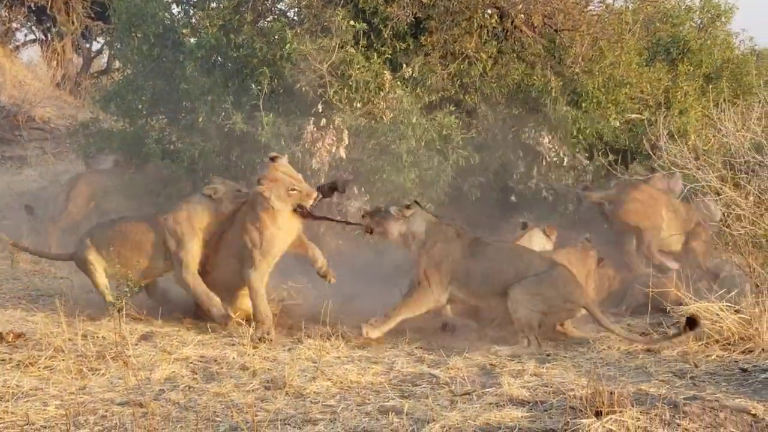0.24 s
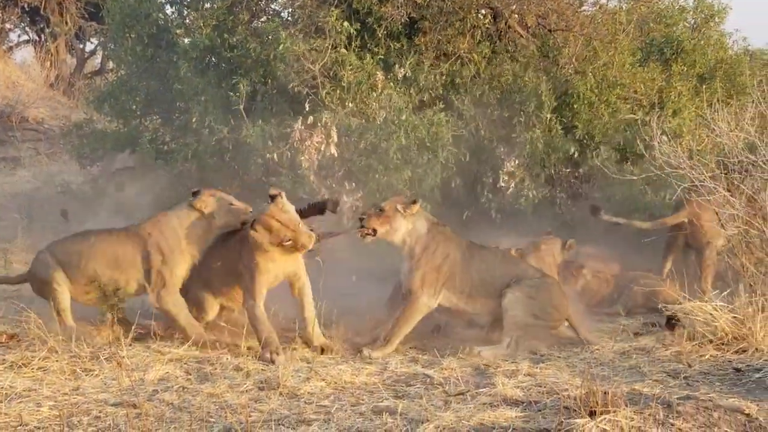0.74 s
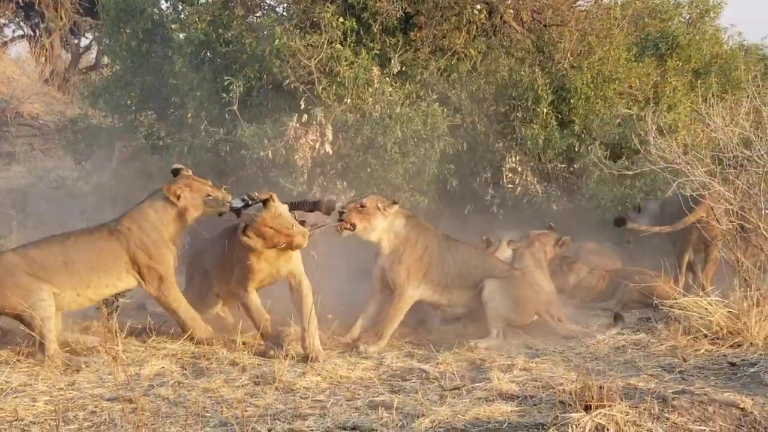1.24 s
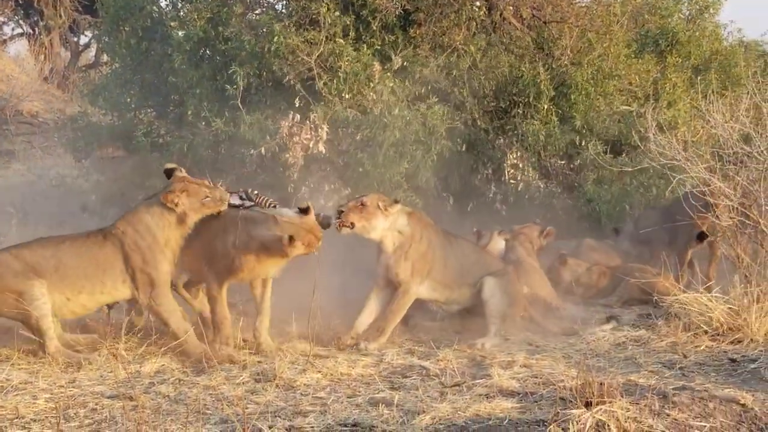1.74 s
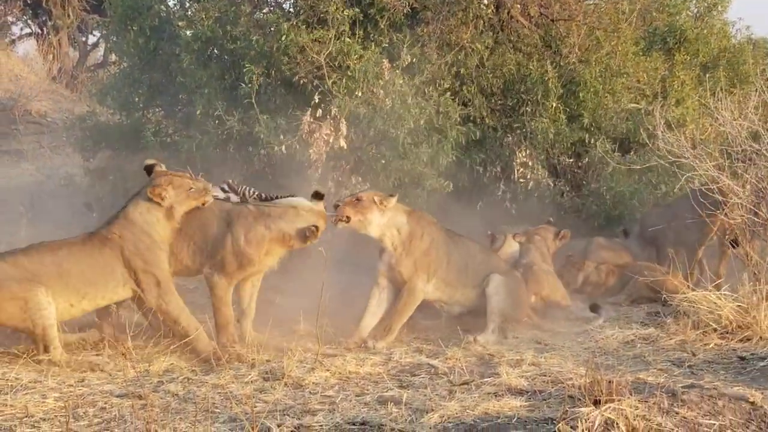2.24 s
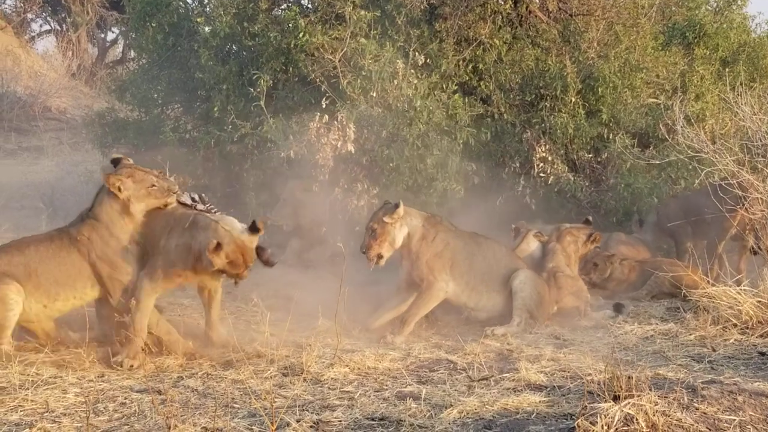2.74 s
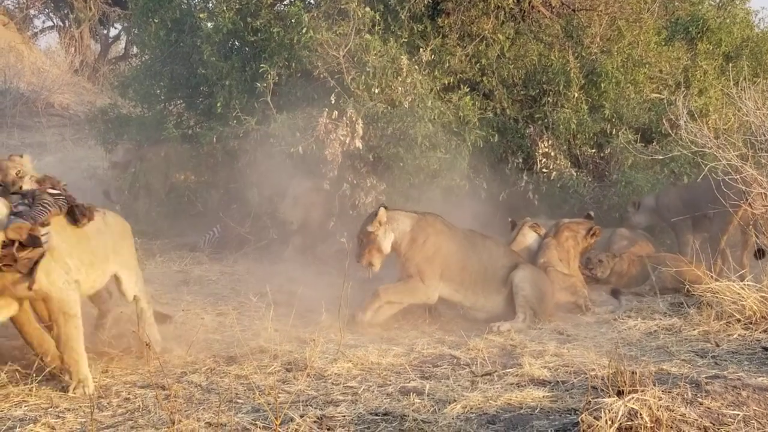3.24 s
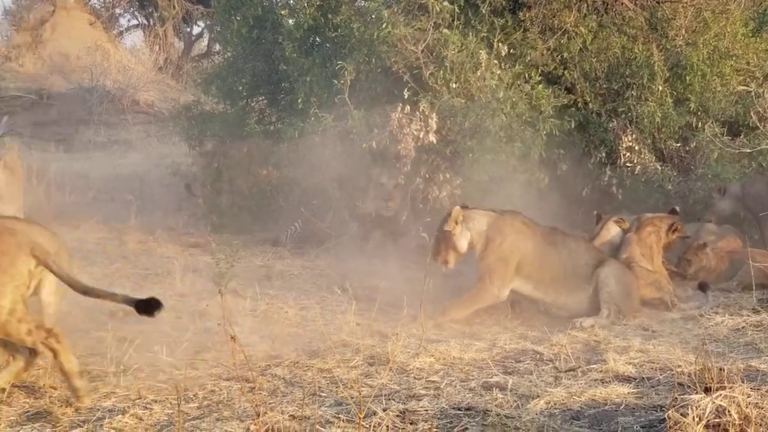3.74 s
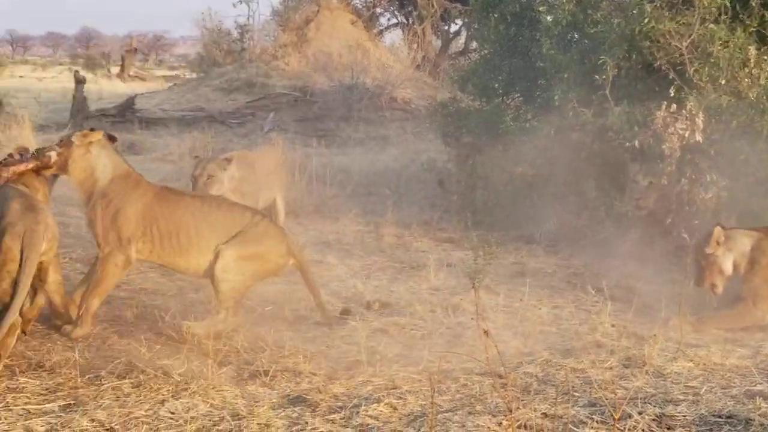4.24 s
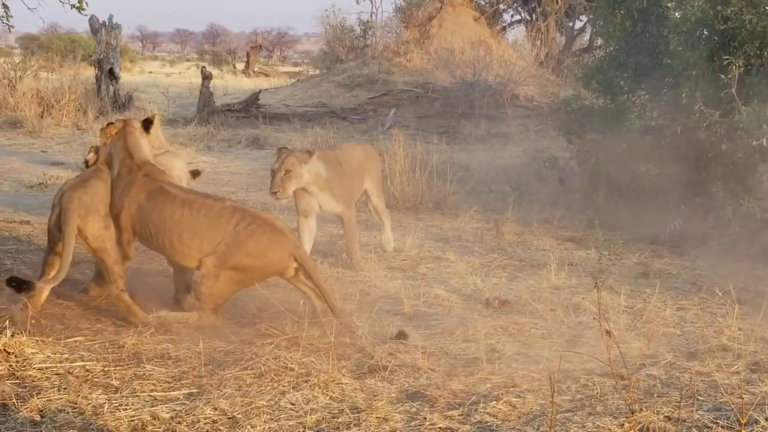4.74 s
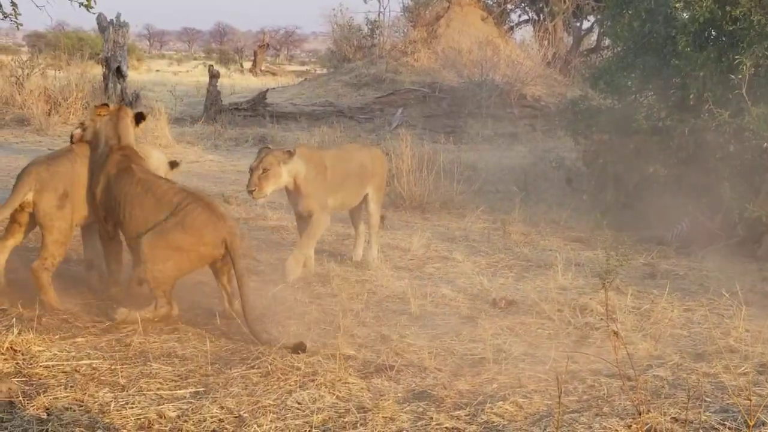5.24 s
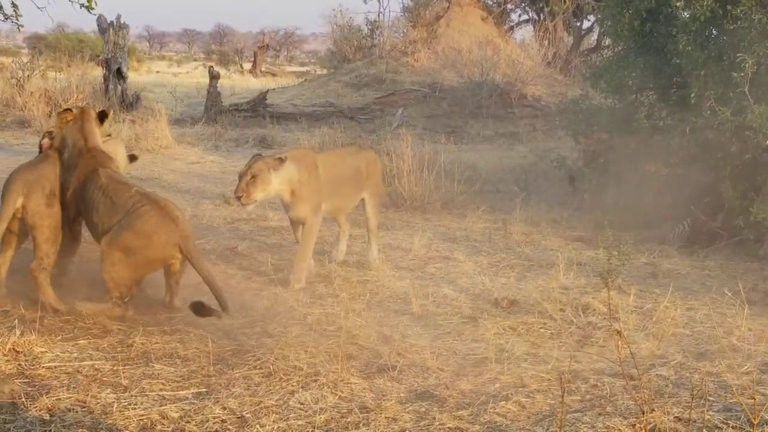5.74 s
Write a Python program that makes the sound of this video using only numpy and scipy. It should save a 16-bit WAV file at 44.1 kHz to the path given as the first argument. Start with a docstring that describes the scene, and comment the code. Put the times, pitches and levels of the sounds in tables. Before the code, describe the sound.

Lionesses tussling over a carcass growl in low, slowly pulsing rumbles that run into each other, with open-mouthed rasping snarls strongest in the first second. Paws sweep through crackling dry grass and stalks tick. A close camera shutter fires once early, then several times after three and a half seconds. Growling thins near five seconds. Outdoors in open bush, stereo microphone beside the camera, almost no echo.

```python
"""Lions growl and snarl over a carcass in dry open bush: slow vocal-fold pulses and breath noise ring
chest, throat and mouth, with rasping air at the teeth and strong single slaps as short sagging tones.
Paws scuff dry grass (flickering hiss with crackle) and stalks snap (short bursts of banded noise).
A close camera shutter rattles now and then, a thin whir (narrow fluttering hiss) follows one shot,
and a faint bed of low-heavy air noise lies beneath."""
import sys
import numpy as np
from scipy import signal
from scipy.fft import rfft, irfft, next_fast_len
from scipy.io import wavfile
from scipy.ndimage import uniform_filter1d

SR = 44100
rng = np.random.default_rng(int(sys.argv[2]) if len(sys.argv) > 2 else 0)


def voltage_ratio(level):
    """Linear amplitude factor for a level in decibels (scalar or array-like)."""
    return 10 ** (np.asarray(level, float) / 20)


def persist_wave(psi):
    """Save psi, clipped to +-1, as 16-bit WAV."""
    counts = np.round(np.clip(psi, -1, 1) * 32767).astype(np.int16)
    wavfile.write(sys.argv[1], SR, np.atleast_2d(counts).T)


N = 264159


def rms_one(x):
    """Scales x to an RMS of 1."""
    return x / np.sqrt(np.mean(x ** 2) + 1e-20)


def evened(x, span_s=0.07):
    """Divides out slow level changes, with a floor so that silence stays quiet."""
    size = int(span_s * SR)
    power = uniform_filter1d(uniform_filter1d(x ** 2, size), size)
    return x / np.sqrt(power + 0.048 * np.mean(x ** 2))


def in_time(rows):
    """Interpolates the columns of a table over time; the first column is in seconds."""
    s, *columns = np.transpose(rows)
    return [np.interp(np.arange(N) / SR, s, c) for c in columns]


def drift(pole_hz):
    """Slow chance of RMS 1: noise through a double pole, computed at every 40th sample."""
    r = np.exp(-2 * np.pi * pole_hz * 40 / SR)
    slow = signal.lfilter([1], [1, -2 * r, r * r], rng.standard_normal(N // 40 + 2002))[2000:]
    return np.interp(np.arange(N) / 40, np.arange(len(slow)), rms_one(slow))


def coloured(x, spectrum):
    """Shapes x by a (Hz, dB) spectrum interpolated on a log-frequency axis."""
    size = next_fast_len(N)
    hz, level_db = np.transpose(spectrum)
    log_hz = np.log(np.arange(size // 2 + 1) * SR / size + 1)
    gain = voltage_ratio(np.interp(log_hz, np.log(hz), level_db))
    return irfft(rfft(x, size) * gain, size)[..., :N]


def poles(hz, width_hz):
    """Filter coefficients of one resonance with about unit gain at its centre."""
    r = np.exp(-np.pi * width_hz / SR)
    return [(1 - r * r) / 2, 0, (r * r - 1) / 2], [1, -2 * r * np.cos(2 * np.pi * hz / SR), r * r]


def resonances(x, modes):
    """Parallel resonances (Hz, width Hz, dB) with alternating signs."""
    return sum((-1) ** k * voltage_ratio(db) * signal.lfilter(*poles(hz, width_hz), x)
               for k, (hz, width_hz, db) in enumerate(modes))


def moving(x, hz, width_hz):
    """A resonance whose centre follows hz, stepped in blocks of 256 samples."""
    out, state = np.zeros(N), np.zeros(2)
    for i in range(0, N, 256):
        out[i:i + 256], state = signal.lfilter(*poles(hz[i], width_hz), x[i:i + 256], zi=state)
    return out


def moving_twice(x, hz, width_hz):
    """Two moving resonances in series, which keep the valleys between cavities dark."""
    return moving(moving(x, hz, width_hz), hz, width_hz)


def band(x, low_hz, high_hz):
    """Band-pass filter."""
    return signal.sosfilt(signal.butter(2, [low_hz, high_hz], "band", fs=SR, output="sos"), x)


def effort(rows, rise_db_per_s, fall_db_per_s):
    """Each row (first s, last s, dB, dB) rises, slides and falls away; powers add. Gives dB."""
    t = np.arange(0, N + 64, 64) / SR
    power = 0
    for first, last, a_db, b_db in rows:
        level_db = np.interp(t, [first, last], [a_db, b_db])
        level_db = level_db - rise_db_per_s * np.maximum(first - t, 0)
        level_db = level_db - fall_db_per_s * np.maximum(t - last, 0)
        power = power + voltage_ratio(2 * level_db)
    return np.interp(np.arange(N) / SR, t, 10 * np.log10(power + 1e-12))


# Stretches of growl, often running straight on. Each row: first in seconds, last in seconds,
# chest level in dB at first, chest level in dB at last, fold slaps per second at first, roughness from 0 to 1.
GROWL_STRETCHES = [(.005, 0.125, -30.5, -38.5, 27.4, 0.45), (0.222, 0.352, -34, -40.5, 41, 0.26),
                   (0.381, 0.496, -29.5, -27, 33, 0.23), (0.52, 0.674, -27, -28, 36, 0.12),
                   (0.689, 0.908, -29.5, -35.5, 37.7, 0.19), (0.918, 1.086, -33.5, -37.5, 32.4, 0.25),
                   (1.112, 1.337, -29, -31, 28.6, 0.29), (1.411, 1.745, -40, -51.5, 32.8, 0.6),
                   (1.814, 2.053, -34.5, -36, 22, 0.2), (2.198, 2.24, -51.5, -42, 25, 0.8),
                   (2.317, 2.454, -30, -43.5, 32.7, 0.27), (2.474, 2.903, -32, -40, 24.5, 0.24),
                   (3.005, 3.166, -36.5, -35.5, 33.4, 0.16), (3.346, 3.437, -36, -26.5, 40.4, 0.31),
                   (3.465, 3.61, -30.5, -33, 37.5, 0.32), (3.606, 3.895, -26, -32.5, 33.2, .17),
                   (3.921, 4.175, -32.5, -35, 32.5, 0.25), (4.206, 4.585, -41, -52.5, 29.8, 0.2),
                   (4.623, 4.695, -57, -47, 27.4, 0.57), (4.745, 4.928, -29.5, -37.5, 41, 0.35),
                   (4.953, 5.188, -38, -42, 32.2, 0.5), (5.389, 5.487, -44, -60.5, 23, 0.62),
                   (5.566, 5.655, -43.5, -45, 37, 0.6), (5.732, 5.79, -51, -34, 30, 0.42),
                   (5.806, 5.999, -34, -38, 26, 0.26)]
SLAPS_PER_S_PER_DB = 0.51   # the folds slow down as the effort sags


def folds(jitter_ms=6.0, uneven_db=4.0, puff_s=0.012):
    """Slack folds slap shut in slow pulses, more uneven when rough; a puff of turbulent air follows each."""
    slaps, rough = np.zeros(N), np.zeros(N)
    for first, last, a_db, b_db, slaps_per_s, roughness in GROWL_STRETCHES:
        roughness = np.clip(roughness, 0, 0.95)
        rough[int(first * SR):] = roughness
        s = first
        # roughness scales both jitter and unevenness
        for shift, size in roughness * rng.standard_normal((20, 2)):
            i = int(np.clip((s + jitter_ms * shift / 1000) * SR, 0, N - 1))
            slaps[i] = voltage_ratio(uneven_db * size)
            change_db = np.interp(s, [first, last], [0, b_db - a_db])
            s += 1 / max(slaps_per_s + SLAPS_PER_S_PER_DB * change_db, 10)
            if s > last:
                break
    puff_shape = signal.lfilter([1], [1, -np.exp(-1 / (puff_s * SR))], slaps + 1e-18)
    puffs = rms_one(puff_shape * rng.standard_normal(N))
    steady = 1.9 * rng.standard_normal(N)
    return np.sqrt(1 - rough) * rms_one(slaps), puffs, rough, steady


# Fixed deep cavities. Each row: centre in Hz, width in Hz.
DEEP_CAVITIES = [(58.2, 14), (96, 28)]
# How the chest shares its rumble. Each row: time in seconds, lowest cavity in dB relative to the chest,
# second cavity in dB relative to the chest, centre of the upper cavity in Hz.
CHEST_SHARES = [(0, -6, -4.5, 156), (.3, -7.5, -6, 144), (.52, -8.5, -2.5, 155), (.68, -6.5, -7, 136),
                (.85, -0.5, -9.5, 147), (1.2, -9, -1, 137), (1.42, -8.5, -2.5, 174), (1.6, -7, -11, 174),
                (1.82, -7, -0.5, 170), (2.05, -3, -4.5, 130), (2.35, -4, -3.5, 137),
                (2.55, -7.5, -2.5, 145), (2.72, -18, -4.5, 128), (2.92, -3, -7.5, 152),
                (3.05, -8, -10.5, 193), (3.17, -13, -8.5, 171), (3.42, -5, -8.5, 148.3),
                (3.6, -7.5, -4, 154), (3.8, -15, -2, 142), (3.95, -10, -6, 175), (4.2, -9, -2.5, 163),
                (4.55, -1.5, -9, 172), (4.8, -11.5, -0.5, 144), (5.05, -4.5, -3.5, 148), (5.5, -4, -6, 165),
                (5.8, -4.5, -3, 134)]
# Fixed ring above the moving cavity. Each row: centre in Hz, width in Hz, level in dB.
WINDPIPE_RING = [(200, 45, -17)]


def chest(voice, upper_width_hz=52):
    """Two fixed deep cavities and a moving upper one that takes the rest of the power, each acting twice."""
    low_db, second_db, upper_hz = in_time(CHEST_SHARES)
    low, second = (evened(signal.lfilter(*poles(*mode), signal.lfilter(*poles(*mode), voice)))
                   for mode in DEEP_CAVITIES)
    upper = moving_twice(voice, upper_hz, upper_width_hz) - resonances(voice, WINDPIPE_RING)
    upper = evened(band(upper, 123, 308))
    rest = np.sqrt(np.clip(1 - voltage_ratio(2 * low_db) - voltage_ratio(2 * second_db), 0.03, 1))
    return voltage_ratio(low_db) * low + voltage_ratio(second_db) * second + rest * upper


# Shape of the throat. Each row: time in seconds, ring level in dB relative to the chest, centre in Hz.
THROAT_SHAPE = [(0, -4.5, 316), (.23, -19, 270), (.42, -19, 295), (.58, -12, 283), (.76, -7.5, 398),
                (1.06, -8, 382), (1.2, -6.5, 406), (1.6, -12.5, 320), (1.88, -27, 320), (2.36, -22, 544),
                (2.47, -25, 480), (2.51, -13.5, 331), (2.86, -20, 350), (3.15, -16.5, 298),
                (3.5, -19.5, 311), (3.6, -17.5, 432), (3.77, -21, 418), (3.95, -20, 330),
                (4.15, -19.5, 383), (4.55, -8, 260), (4.8, -20, 315), (5.15, -20, 323.7), (5.4, -13, 318),
                (5.64, -14, 464), (5.8, -22.5, 320)]


def throat(voice, puffs, rough, chest_db, width_hz=81):
    """The throat rings at a moving pitch; rough effort adds puffs of air past it."""
    rel_db, hz = in_time(THROAT_SHAPE)
    ring = moving_twice(voice, hz, width_hz) + 1.42 * rough * puffs
    return voltage_ratio(chest_db + rel_db) * evened(band(band(ring, 198, 587), 198, 587))


# Jaws open in a snarl. Each row: first in seconds, last in seconds, mouth level in dB at first,
# mouth level in dB at last, mouth centre in Hz, rasp level in dB relative to the mouth, rasp centre in Hz.
SNARL_SHAPES = [(0, 0.122, -45.5, -51.5, 800, -4, 3200), (0.328, 0.448, -51.5, -43, 844, -11, 3100),
                (0.509, 0.624, -36.5, -37.5, 820, -14, 2920), (0.69, 0.877, -41, -49.5, 544, -13.5, 1800),
                (0.863, 1.062, -51.5, -56, 776, -12, 1650), (1.118, 1.307, -51, -57.5, 719, -4, 3050),
                (1.996, 2.04, -63, -61.5, 750, -9, 2280), (2.313, 2.404, -51, -53, 860, -7, 1260),
                (2.457, 2.573, -57, -59.5, 993, 1.5, 2840), (2.611, 2.657, -53.5, -64.5, 880, 0.5, 3020),
                (2.7, 2.833, -64, -60, 1120, -14.5, 1450), (3.374, 3.442, -50.5, -43.5, 910, -4, 3156),
                (3.492, 3.522, -54, -57, 1200, 1.5, 2930), (3.542, 3.885, -50.5, -57.5, 860, -8, 1630),
                (3.937, 4.55, -55, -64, 570, -11.5, 1440), (4.749, 4.909, -50.5, -50, 1080, -8, 1770),
                (4.973, 5.123, -52.5, -68, 857, -25, 1800), (5.823, 5.993, -56, -64.5, 1100, -5, 1840)]
SNARL_RISE_DB_PER_S, SNARL_FALL_DB_PER_S = 394, 254
# Side cavities of the open mouth. Each row: centre in Hz, width in Hz, level in dB.
MOUTH_CAVITIES = [(737, 29, 2.9), (1223, 20, 3.4)]


def mouth(slaps, puffs, rough, steady, hz, width_hz=170):
    """Wide jaws let the slaps out sharp and open side cavities; rough effort fills the valleys with dull air."""
    level_db = effort(np.array(SNARL_SHAPES)[:, :4], SNARL_RISE_DB_PER_S, SNARL_FALL_DB_PER_S)
    gape = np.clip((level_db + 53.5) / 16, 0, 1)
    breath = puffs + steady
    bite = (1.6 + 1.16 * gape) * slaps + (rough + 0.24 * (1 - gape)) * breath
    dull_air = signal.lfilter([0.12], [1, -0.88], breath)
    ring = moving_twice(bite, hz, width_hz)
    ring += gape ** 2 * resonances(bite, MOUTH_CAVITIES) + 1.88 * rough * dull_air
    return voltage_ratio(level_db) * evened(band(ring, 234, 990))


# Fixed rings of the rasp. Each row: centre in Hz, width in Hz, level in dB.
RASP_RINGS = [(1366, 330, 4.6), (2550, 550, 2.4), (3240, 820, 3)]


def teeth_rasp(slaps, rough, steady, hz, width_hz=660, spurt_s=0.005):
    """Mostly air, spurting past the teeth at each slap, through moving and fixed resonances."""
    rows = [(a, b, a_db + db, b_db + db) for a, b, a_db, b_db, _, db, _ in SNARL_SHAPES]
    level_db = effort(rows, SNARL_RISE_DB_PER_S, SNARL_FALL_DB_PER_S)
    uneven_slaps = slaps * voltage_ratio(5 * rng.standard_normal(N))
    spurts = signal.lfilter([1], [1, -np.exp(-1 / (spurt_s * SR))], uneven_slaps)
    air = 0.4 * slaps + rms_one(spurts * steady) + 0.45 * rough * steady
    rasp = moving_twice(air, hz, width_hz) + 0.4 * resonances(air, RASP_RINGS)
    return voltage_ratio(level_db + 2.9 * drift(18.0)) * evened(band(rasp, 1140, 6100))


def lions():
    """One fold source drives chest, throat, mouth and teeth; returns the low voice and the rasp."""
    chest_db = effort(np.array(GROWL_STRETCHES)[:, :4], rise_db_per_s=420, fall_db_per_s=288)
    # each snarl holds its shape
    mouth_hz, rasp_hz = in_time([(s, row[4], row[6]) for row in SNARL_SHAPES for s in row[:2]])
    slaps, puffs, rough, steady = folds()
    voice = slaps + 1.57 * rough * (puffs + steady)
    low = voltage_ratio(chest_db) * chest(voice) + throat(voice, puffs, rough, chest_db)
    low = low + mouth(slaps, puffs, rough, steady, mouth_hz)
    return low, teeth_rasp(slaps, rough, steady, rasp_hz)


# Echoes off bushes. Each row: delay in seconds at the first ear, level in dB before wet_db.
BUSH_ECHOES = [(0.01, 15.5), (0.028, 12), (0.05, 18.5)]


def bush(x, wet_db):
    """Open ground: a few dull echoes, at other delays for each ear."""
    dull, out = signal.lfilter([0.25], [1, -0.75], x), np.zeros((2, N))
    for delay_s, level_db in BUSH_ECHOES:
        for ear, stretch in enumerate([1, 1.13]):
            lag = int(delay_s * stretch * SR)
            out[ear, lag:] += voltage_ratio(level_db + wet_db) * dull[:N - lag]
    return x + out


# Dry grass under the paws. Each row: time in seconds, level in dB.
PAW_SCUFFS = [(0.0, -55.5), (0.4, -45.5), (0.83, -43.5), (1.0, -52), (1.32, -49), (1.5, -50.5),
              (1.75, -50.5), (2.2, -50), (2.55, -50), (2.7, -56), (3.32, -50), (3.85, -53), (4.25, -46.5),
              (4.69, -49.5), (5.09, -51), (5.55, -53.5), (5.99, -56)]
# A paw or flank sweeps through the stalks. Each row: centre in seconds, rise in dB above the rustle,
# length in seconds.
STALK_SWEEPS = [(0.098, 15.5, 0.17), (0.984, 8, 0.07), (1.237, 7.5, 0.046), (2.735, 11, 0.1),
                (2.877, 7.5, 0.04), (3.299, 8.5, 0.037), (3.485, 5, 0.061), (3.76, 7.5, 0.075),
                (4.132, 6, 0.056)]
# Spectrum of the rustle. Each row: frequency in Hz, relative density in dB per Hz.
GRASS_SPECTRUM = [(1470, -14.5), (2500, -18.5), (3010, -15.5), (4060, -14.5), (5160, -15.5), (7890, -14.5),
                  (8720, -8), (12300, -1.5), (15800, -8.5)]


def grass(crackles_per_s=900):
    """A wide hiss of brushed stalks, flickering, with fine crackle in it."""
    crackle = rng.random((2, N)) < crackles_per_s / SR
    crackle = crackle * voltage_ratio(4.0 * np.minimum(rng.exponential(1, (2, N)), 4))
    crackle = crackle * rng.choice([-1, 1], (2, N))
    brush = rng.standard_normal((2, N)) * voltage_ratio(2.4 * drift(12.2))
    t = np.arange(N) / SR
    sweeps_db = sum(db * np.exp(-((t - s) / length_s) ** 2) for s, db, length_s in STALK_SWEEPS)
    rustle = rms_one(coloured(brush + 0.49 * rms_one(crackle), GRASS_SPECTRUM))
    return voltage_ratio(in_time(PAW_SCUFFS)[0] + sweeps_db) * rustle


# Spectrum of the air. Each row: frequency in Hz, relative density in dB.
AIR_SPECTRUM = [(18, -76), (30, 19.5), (65, 5), (159, -9), (323, -6), (601, -26), (2580, -68),
                (11000, -120)]


def open_air(level_db=-56.5):
    """A steady low-heavy noise, part common to both ears and part opposite."""
    mid, side = coloured(rng.standard_normal((2, N)), AIR_SPECTRUM)
    return voltage_ratio(level_db) * rms_one(mid + 0.69 * side * np.array([[1], [-1]]))


# Strong single slaps that ring the throat or mouth. Each row: start in seconds, level in dB,
# starting pitch in Hz.
HARD_SLAPS = [(0.4, -33.5, 480), (0.437, -30.5, 329), (0.5, -41, 860), (1.113, -33, 402), (1.148, -27, 450),
              (1.203, -36, 397.6), (1.221, -28.5, 429), (1.29, -31, 425), (1.953, -41, 347),
              (1.999, -36.5, 337), (2.045, -40, 352), (2.63, -43, 840), (2.731, -38, 337),
              (2.78, -39.5, 310), (2.825, -37.5, 360), (3.396, -45.5, 963), (4.745, -45, 966),
              (4.888, -47, 1200), (5.114, -38.5, 322), (5.64, -39, 481), (5.946, -40.5, 327)]


def hard_slaps(rise_s=0.003, usual_ring_s=0.009, overtone_db=-20.0, usual_db=-38.0):
    """A swell of a few cycles, sagging in pitch; harder slaps ring longer and wake the next rings."""
    out, t = np.zeros(N), np.arange(3000) / SR
    for (s, level_db, hz), turn in zip(HARD_SLAPS, rng.random(len(HARD_SLAPS))):
        i, push_db = int(s * SR), level_db - usual_db
        ring_s = usual_ring_s * voltage_ratio(0.56 * push_db)
        shape = (1 - np.exp(-t / rise_s)) * np.exp(-t / ring_s)
        cycles = 2 * np.pi * (hz * t * (1 - 0.94 * t) + turn)
        overtones = np.sin(1.75 * cycles) + 0.4 * np.sin(2.72 * cycles)
        ring = np.sin(cycles) + voltage_ratio(overtone_db + 0.6 * push_db) * overtones
        out[i:i + 3000] += (voltage_ratio(level_db) * shape / shape.max() * ring)[:N - i]
    return out


# Stalks snap. Each row: start in seconds, relative level in dB, centre in Hz.
STALK_SNAPS = [(1.203, -36, 12000), (1.499, -33.5, 13100), (1.9901, -47.5, 3100), (2.29, -42.5, 2940),
               (2.2885, -50, 1180), (3.037, -35, 10700), (3.244, -36, 12600), (3.6222, -40.5, 10700),
               (4.27, -48, 1270), (4.823, -49, 12250), (5.3258, -42.5, 11600), (5.558, -31.5, 12000)]


def snaps(decay_s=0.0024, edge_ratio=0.84):
    """Each snap is a few milliseconds of noise around its own pitch."""
    out, t = np.zeros((2, N)), np.arange(500) / SR
    for s, level_db, hz in STALK_SNAPS:
        burst = rng.standard_normal((2, 500)) * np.exp(-t / decay_s)
        burst = band(burst, hz * edge_ratio, min(hz / edge_ratio, 0.45 * SR))
        i = int(s * SR)
        out[:, i:i + 500] += burst / abs(burst).max() * voltage_ratio(level_db + 8.0)
    return out


# Shutter firings. Each row: start in seconds, relative level in dB.
SHUTTER_SHOTS = [(1.4127, -37), (3.5507, -38), (3.862, -40), (4.1493, -39.5), (4.367, -40.5), (5.37, -38.5),
                 (5.81, -40.5)]
# Spectrum of the rattle. Each row: frequency in Hz, relative density in dB per Hz.
SHUTTER_SPECTRUM = [(850, -1), (1200, -1), (1810, -2), (3610, 1), (4020, 3.5), (6250, 2), (7840, -8.5),
                    (8640, 4), (12200, 7.5), (15800, -1)]
# Rings of the housing. Each row: centre in Hz, width in Hz, level in dB.
HOUSING_RINGS = [(1358, 39, 0.5), (1585, 35, 1.5), (1800, 39, 2.5), (2390, 220, -1)]


def shutter(rise_s=0.002, run_s=0.011, second_s=0.04, second_db=-34.5, second_decay_s=0.016):
    """The curtain runs as a dense rattle, a weaker knock follows; the housing rings briefly."""
    rattle, t = np.zeros((2, N)), np.arange(4000) / SR
    shape = (1 - np.exp(-t / rise_s)) * np.exp(-t / run_s)
    shape += voltage_ratio(second_db) * (t > second_s) * np.exp(-abs(t - second_s) / second_decay_s)
    for s, level_db in SHUTTER_SHOTS:
        i = int(s * SR)
        rattle[:, i:i + 4000] += shape * rng.standard_normal((2, 4000)) * voltage_ratio(level_db)
    curtain = voltage_ratio(6.5) * coloured(rattle, SHUTTER_SPECTRUM)
    housing = voltage_ratio(17.0) * resonances(rattle, HOUSING_RINGS)
    return (curtain + housing) * voltage_ratio([[-1.2], [1.2]])


# Whir after one shot. Each row: time in seconds, level in dB.
WHIR_LEVEL = [(5.4, -60), (5.46, -60), (5.75, -68), (5.87, -71), (5.93, -62), (5.99, -71)]


def whir():
    """A narrow fluttering hiss: noise through two resonances and a band-pass."""
    hiss = resonances(rng.standard_normal((2, N)), [(1660, 34, 0.0), (1840, 230, -12.0)])
    on = np.arange(N) > WHIR_LEVEL[0][0] * SR
    return on * voltage_ratio(in_time(WHIR_LEVEL)[0] + 0.48 * drift(45.0)) * rms_one(band(hiss, 1730, 2200))


def scene():
    """Places lions, grass, shutter, whir and air between the two ears."""
    low, rasp = lions()
    voices = bush(low + hard_slaps(), wet_db=-36.5) * voltage_ratio([[0.7], [-0.7]])
    rasp = bush(rasp, wet_db=-16) * voltage_ratio([[-0.5], [0.5]])
    rasp[1] = np.roll(rasp[1], 6)   # the rasp reaches one port a little late
    rustle = grass() + snaps()
    rustle = rustle - 0.014 * rustle[::-1]   # the ports widen the treble
    return voices + rasp + rustle + shutter() + whir() + open_air()


def roll_off(x):
    """The treble ends steeply here."""
    return signal.sosfilt(signal.butter(12, 16670, fs=SR, output="sos"), x)


def record(dry):
    """The microphone drops the deepest bass and the top is cut."""
    no_bass = signal.sosfilt(signal.butter(4, 36, "high", fs=SR, output="sos"), dry)
    mix = signal.sosfilt(signal.cheby2(20, 60, 16050, fs=SR, output="sos"), no_bass)   # stopband edge in Hz
    return roll_off(mix)


dry = scene()
out = record(dry)
persist_wave(out)
```